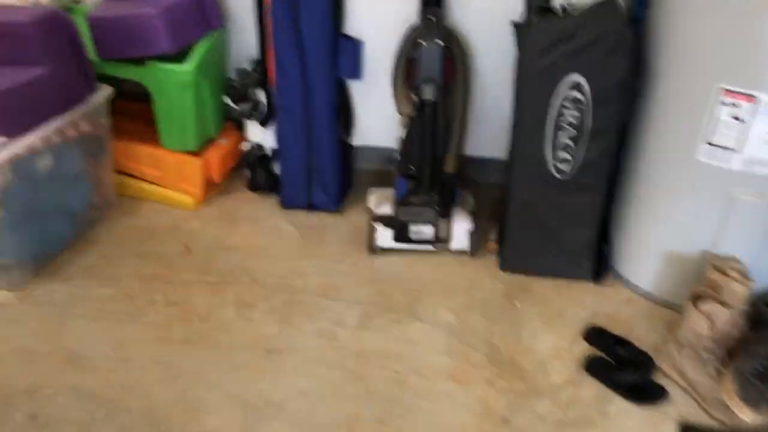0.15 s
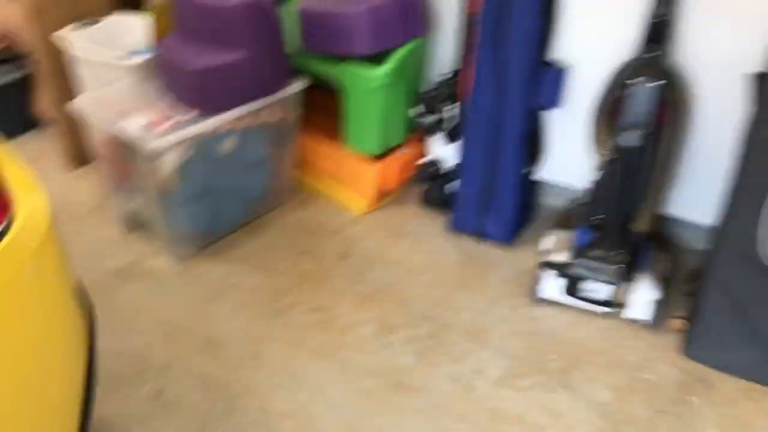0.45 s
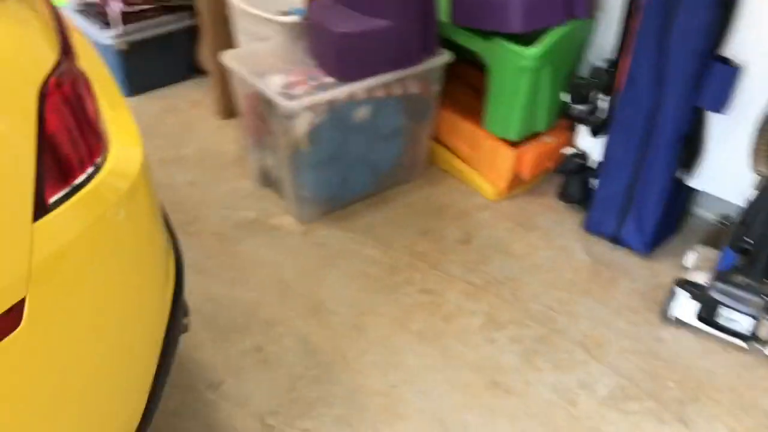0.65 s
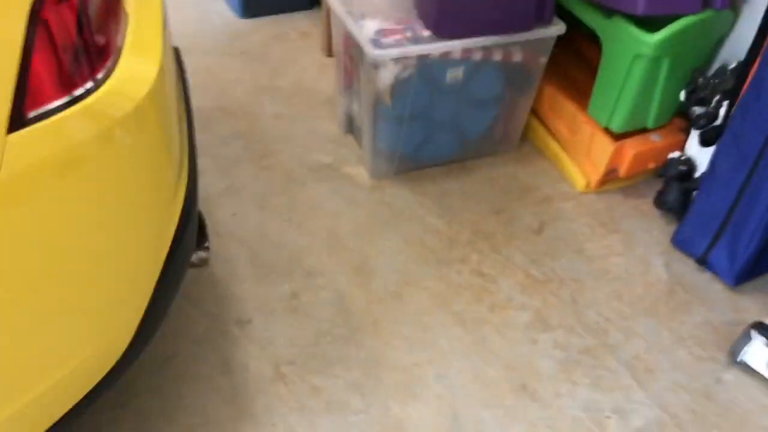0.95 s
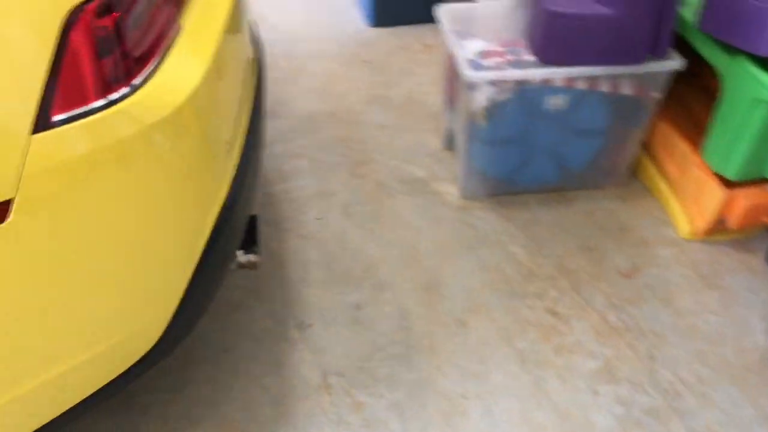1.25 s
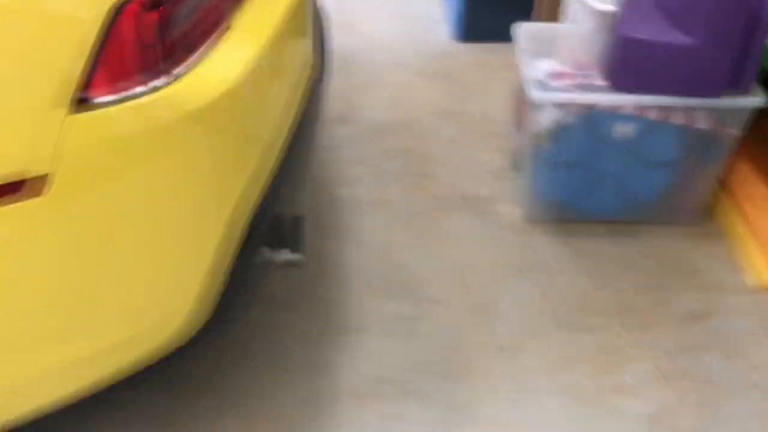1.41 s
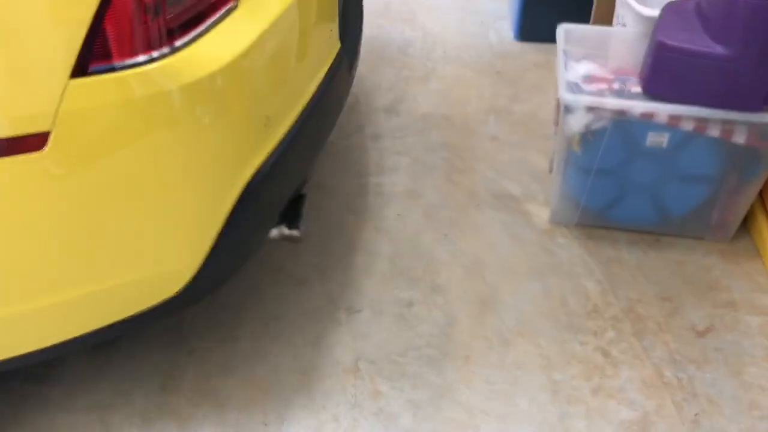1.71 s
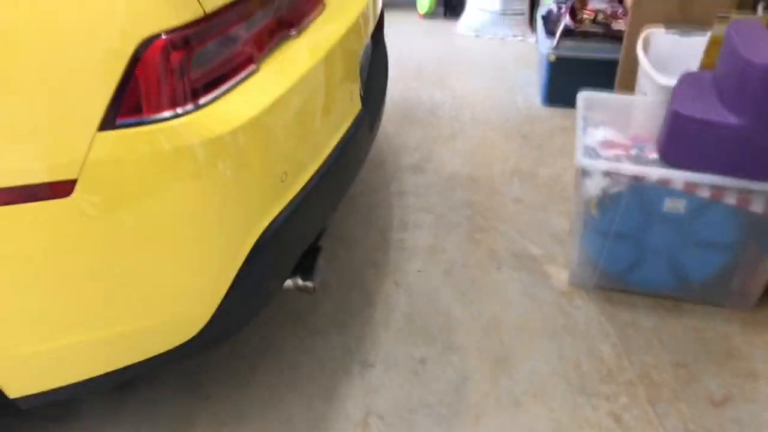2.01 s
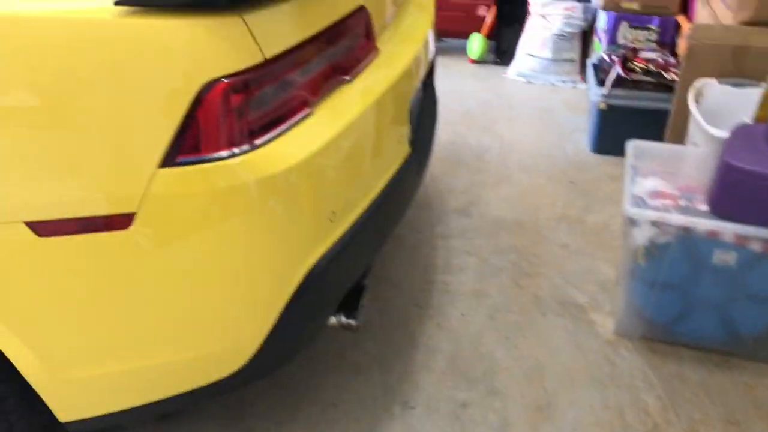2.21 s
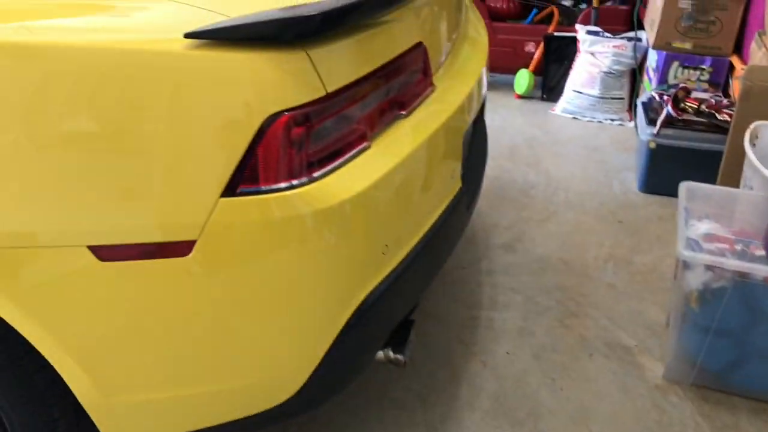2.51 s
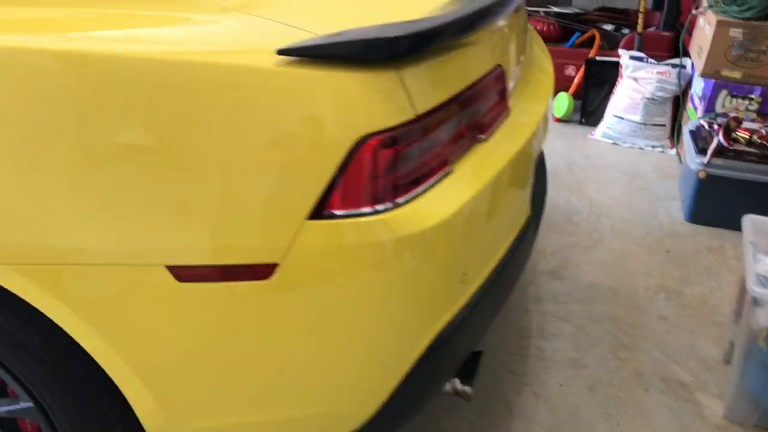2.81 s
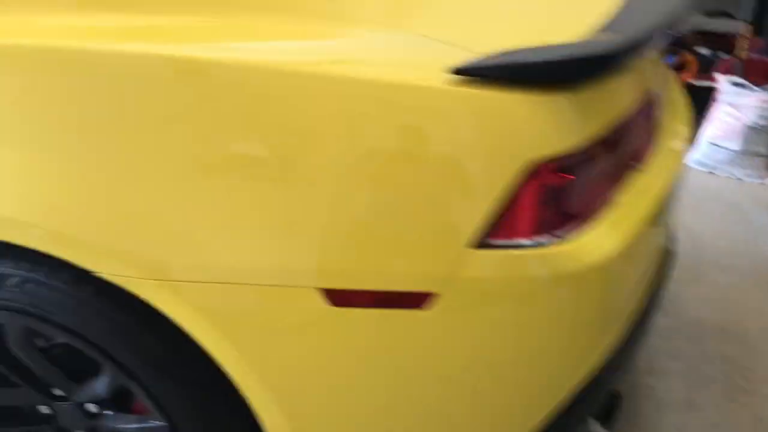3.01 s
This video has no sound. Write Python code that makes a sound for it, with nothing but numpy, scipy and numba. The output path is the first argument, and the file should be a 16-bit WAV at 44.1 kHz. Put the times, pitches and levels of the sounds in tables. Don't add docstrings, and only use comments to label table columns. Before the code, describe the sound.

Close phone pickup of a muscle car idling indoors: low exhaust boom, ringing pipes, puffing hiss and light valve ticks, broken by an abrupt silence, then a loud return that smooths and eases slightly.

```python
import sys
import numpy as np
from scipy import signal
from scipy.io import wavfile
from scipy.ndimage import uniform_filter1d
from numba import njit

SR = 44100
rng = np.random.default_rng(int(sys.argv[2]) if len(sys.argv) > 2 else 0)


def transcribe(u):
    v = np.clip(np.atleast_2d(u).T, -1, 1)
    q = np.round(v * 32767).astype(np.int16)
    wavfile.write(sys.argv[1], SR, q)


def elevation(decibels):
    levels = np.asarray(decibels, float)
    return 10 ** (levels / 20)


N = 138915

# start_s, rate_hz
FIRING_RATE = [(0, 61), (.26, 60.7), (.79, 61.1), (1.2, 58.6), (1.45, 58.45), (1.75, 58.75), (1.95, 58.5),
               (2.2, 57.6), (2.38, 57.3), (2.5, 56.2), (2.64, 56.4), (2.9, 55.5), (3.15, 55.9)]
CYLINDER_SURPLUS = [1, .15, -1, -.2, .8, -.1, -.8, .15]
PIPE_DELAYS = [0, .0011, .0004, -.0008, .0003, -.0004, .0009, -.0011]
# pitch_hz, width_hz, level_db
GARAGE_WAVES = [(108, 14, 0), (122, 16, -6), (165, 34, -7)]
# pitch_hz, width_hz, level_db
PIPE_RINGS = [(291.6, 15, 4), (361.5, 12, -5), (420, 100, -23.5)]
# pitch_hz, width_hz, level_db
LOW_RING = [(237.7, 28, 0)]
# pitch_hz, width_hz, level_db
RASP_RINGS = [(960, 160, -1), (1260, 290, -3.5)]
# start_s, low_ring_level_db, firing_scatter (0-1)
TAILPIPES = [
    (0, -45, .3),
    (.5, -27, 0.4),
    (.79, -18.5, 0.4),
    (1.2, -15, 0.42),
    (1.4, -18, .05),
    (1.65, -23.5, 0.1),
    (2, -37, .03),
    (2.2, -35.5, .4),
    (2.6, -29.5, 0.8),
    (3.15, -22, 0.8),
]
# start_s, boom_level_db, garage_level_db, pipe_level_db,
# clatter_level_db, brightness_db, lumpiness (0-1)
PHONE_WALK = [(0, -17, -16.5, -17, -23, 3, 1), (.2, -18.5, -18, -27, -21.5, 2, 0.5),
              (.45, -15.5, -19, -25, -21.5, 2, .8), (.66, -11.5, -23, -25.5, -21, 3, 0.9),
              (.79, -13, -18.5, -16, -19.5, 3, 0.7), (1.205, -21, -16, -19, -15.5, 4, .5),
              (1.24, -7.5, -22.5, -19, -17.5, 3.5, .4), (1.299, -12, -19.5, -13, -19, 2, 0.8),
              (1.5, -10, -29.5, -18, -22.5, 2.5, 0.1), (1.75, -10, -25, -22, -23, 3, 0.1),
              (2, -9.5, -28.5, -23.5, -23, 1.5, .15), (2.14, -14, -29, -29, -23, 1.5, 0.7),
              (2.332, -10.5, -26, -26, -24, 2, .4), (2.461, -15.5, -22, -28, -23, 0.5, 0.4),
              (2.65, -13.5, -24, -24.5, -23.5, 2, 0), (2.852, -16, -19.5, -26.5, -22.5, 1.5, 0),
              (3.15, -17.5, -23, -22, -23, 2.5, 0.2)]
# pitch_hz, level_db (per Hz)
BAY_COLOUR = [(210, -30), (350, -5.5), (404, 2), (928, 2), (1520, -12), (2030, -5), (4970, -21),
              (11400, -21.5), (16000, -33.5)]
# pitch_hz, width_hz, level_db (over the colour)
BAY_RINGS = [(642, 150, 4.5), (950, 31, 2.5), (1550, 110, -7), (2030, 800, 3), (2624, 190, 4.5),
             (4975, 370, -9), (5730, 2400, 4), (7890, 950, -4), (9600, 1300, 2.5), (10300, 880, -5),
             (11400, 500, 5)]
# start_s, level_db (peak), pitch_hz (centre)
VALVE_TICKS = [(0.4423, -21.5, 7420), (0.4915, -17, 11560), (0.5728, -19, 5920), (0.621, -14.5, 12900),
               (0.7024, -18, 5920), (0.7534, -16, 12070), (1.2052, -15, 11700), (1.261, -10, 11800),
               (1.3452, -14, 6200), (1.3966, -14, 10400), (1.4305, -18.5, 6440), (1.4679, -17.5, 9010),
               (1.5653, -15.5, 5900), (1.6025, -27, 11200), (1.6696, -16, 11400), (1.838, -23, 6500),
               (1.8751, -21.5, 9430), (2.026, -27, 6400), (2.0622, -21.5, 9600), (2.152, -26, 5830),
               (2.36, -22, 9600), (2.5015, -20, 9800), (2.6418, -18, 9640), (2.8572, -21, 9500),
               (2.9662, -23.5, 5770), (2.9992, -20.5, 6350), (3.0719, -19, 5730)]

STRENGTH_SCATTER, TIMING_JITTER, BOOM_LAG_TURNS = .25, .007, .1
NODE_S, NODE_WIDTH_S = 2.22, .08
RUMBLE_DB, RASP_DB, GARAGE_WAVER_DB = -27.5, -12.5, 2
PUFF_DEPTH_DB, PUFF_DECAY_TURNS, FLICKER_DB, SWELL_DB = 5.5, .55, 1.3, 0.48
TICK_T60_S, TICK_DB, TICK_WIDTH, TICK_ATTACK_S = 0.076, -4.5, 0.13, .002
ECHO_T60_S, ECHO_DB, ECHO_WIDTH_HZ, STEP_S = .08, -7, 3000, .085
DROPOUT_S, RETURN_S = .788, 1.2052


def exhaust(turns):
    t = np.arange(N) / SR
    pipes = np.array(TAILPIPES)
    low_db = np.interp(t, pipes[:, 0], pipes[:, 1])
    loose = np.interp(t, pipes[:, 0], pipes[:, 2])
    pulses = firing_pulses(turns)
    rough = pulses * (1 + np.clip(loose, 0, .7) * np.clip(rng.standard_normal(N), -1.5, 1.5))

    boom = np.sqrt(2) * np.cos(2 * np.pi * (turns - BOOM_LAG_TURNS)) * elevation(control(column=1))
    turbulence = rumble()
    gas = rng.standard_normal(N) * np.exp(-(turns % 1) / PUFF_DECAY_TURNS)
    rasp = level(ring(gas, RASP_RINGS, 1), low_db + RASP_DB)
    side = np.tanh((t - NODE_S) / NODE_WIDTH_S)
    garage_db = control(column=2) + GARAGE_WAVER_DB * wander(10)
    garage = side * level(ring(pulses, GARAGE_WAVES, 0.88), garage_db)
    pipe = level(ring(rough, PIPE_RINGS, -0.79), control(column=3))
    low = level(ring(rough, LOW_RING, -1), low_db)
    return boom + rasp + garage + pipe + low + turbulence


def firing_pulses(turns):
    starts = np.flatnonzero(np.diff(np.floor(turns)) > 0)
    cylinder = turns[starts + 1].astype(int) % 8
    chance = rng.standard_normal((400, 2))[:len(starts)].T
    lump = np.clip(control(column=6)[starts], 0, 1)
    strength = 1 + lump * (np.array(CYLINDER_SURPLUS)[cylinder] + STRENGTH_SCATTER * chance[0])
    jitter = TIMING_JITTER * (1 + 2 * lump) * chance[1] * SR / 58
    delay = lump * np.array(PIPE_DELAYS)[cylinder] * SR
    pulses = np.zeros(N)
    pulses[np.clip(starts + (jitter + delay).astype(int), 0, N - 1)] = strength
    return pulses


def rumble():
    noise = svf(svf(rng.standard_normal(N), 160.0, 300.), 200.0, 400.)
    return level(noise, RUMBLE_DB + control(column=4) + 23)


def clatter(turns):
    puff_size = elevation(1.5 * rng.standard_normal(400))
    puff = puff_size[turns.astype(int)] * np.exp(-(turns % 1) / PUFF_DECAY_TURNS)
    colour = np.array(BAY_COLOUR)
    swell, bright = wander(5.71), control(column=5)
    out = 0
    for hz in 400 * 2 ** np.arange(0, 5.4, 1 / 3):
        db = np.interp(np.log(hz), np.log(colour[:, 0]), colour[:, 1]) + 10 * np.log10(hz)
        db = db + SWELL_DB * swell + FLICKER_DB * wander(17) + PUFF_DEPTH_DB * puff
        db = db + bright * np.clip(np.log2(hz / 3000), 0, 2.4)
        out = out + elevation(db) * svf(rng.standard_normal(N), hz, hz / 4)
    for hz, width, db in BAY_RINGS:
        out = out + (elevation(db) - 1) * svf(out, float(hz), float(width))
    return out


def ticks():
    out, t = np.zeros(N + 4000), np.arange(4000) / SR
    noise = rng.standard_normal((40, 4000))
    fade = np.minimum(t / TICK_ATTACK_S, 1) * np.exp(-np.log(1000) * t / TICK_T60_S)
    for k, (start_s, db, hz) in enumerate(VALVE_TICKS):
        snap = svf(noise[k], float(hz), TICK_WIDTH * hz) + 0.24 * noise[k]
        start = int(start_s * SR)
        out[start:start + 4000] += level(snap, db + TICK_DB) * fade
    return out[:N]


def walls(x):
    out, t, hop = np.zeros(N + 8000), np.arange(4000) / SR, int(STEP_S * SR)
    noise = rng.standard_normal((60, 4000))
    decay = np.exp(-np.log(1000) * t / ECHO_T60_S)
    width = float(ECHO_WIDTH_HZ)
    for k in range(min(N // hop + 2, 60)):
        a, b = max((k - 1) * hop, 0), min((k + 1) * hop, N)
        fade = np.cos(np.pi / 2 * (np.arange(a, b) / hop - k))
        echo = decay * svf(svf(noise[k], 1400., width), 1400., width)
        out[a:b + 3999] += signal.fftconvolve(x[a:b] * fade, echo / np.sqrt(np.sum(echo ** 2)))
    return x + elevation(ECHO_DB) * out[:N]


def level(x, db):
    return x * elevation(db) / np.sqrt(np.mean(x ** 2))


@njit
def svf(x, hz, width):
    y, band, low = np.empty(len(x)), 0., 0.
    g, k = np.tan(np.pi * hz / SR), width / hz
    for i in range(len(x)):
        v = (band + g * (x[i] - low)) / (1 + g * (g + k))
        band = 2 * v - band
        low = low + 2 * g * v
        y[i] = k * v
    return y


def ring(x, table, sign):
    out = 0
    for k, (hz, width, db) in enumerate(table):
        once = svf(x, float(hz), 1.8 * width)
        out = out + sign ** k * elevation(db) * svf(once, float(hz), 1.8 * width)
    return out


def wander(rate):
    k = int(SR / rate)
    held = np.repeat(rng.standard_normal(N // k + 1), k)
    return uniform_filter1d(uniform_filter1d(held, k), k)[:N]


def control(column):
    rows = np.array(PHONE_WALK)
    return np.interp(np.arange(N) / SR, rows[:, 0], rows[:, column])


def scene():
    t, firing = np.arange(N) / SR, np.array(FIRING_RATE)
    turns = np.cumsum(np.interp(t, firing[:, 0], firing[:, 1])) / SR
    pipes = exhaust(turns)
    bay = level(walls(clatter(turns)), control(column=4))
    return (pipes + bay + ticks())[None]


def low_pass(x):
    return signal.sosfilt(signal.butter(12, 16110, fs=SR, output="sos"), x)


def record(dry):
    t = np.arange(N) / SR
    low_cut = signal.butter(1, 30, "high", fs=SR, output="sos")
    x = signal.sosfilt(low_cut, dry)
    before = np.tanh(0.81 * x) / 0.82 * (t < DROPOUT_S)
    after = np.tanh(0.82 * x) / 0.74 * (t > RETURN_S)
    x = signal.sosfilt(low_cut, after) + before
    mix = signal.sosfilt(signal.ellip(12, .2, 90, 15680, fs=SR, output="sos"), x)
    return low_pass(mix)


dry = scene()
out = record(dry)
transcribe(out)
```